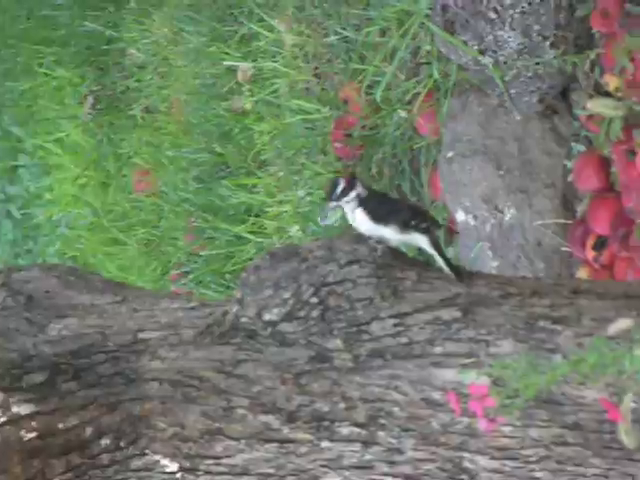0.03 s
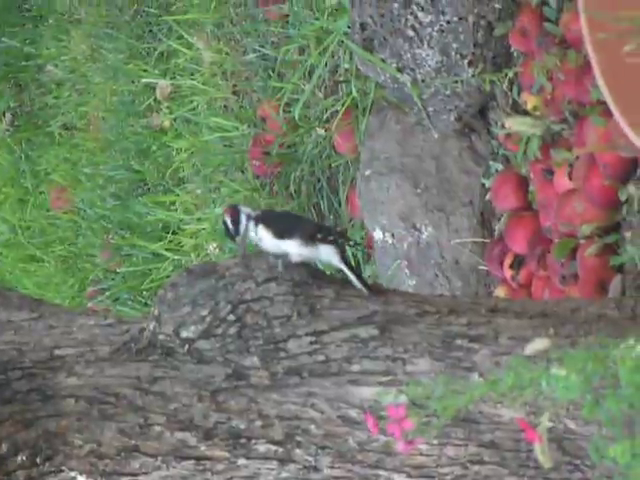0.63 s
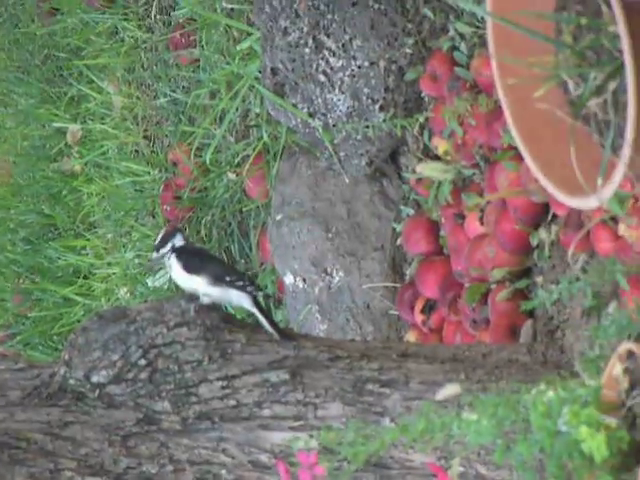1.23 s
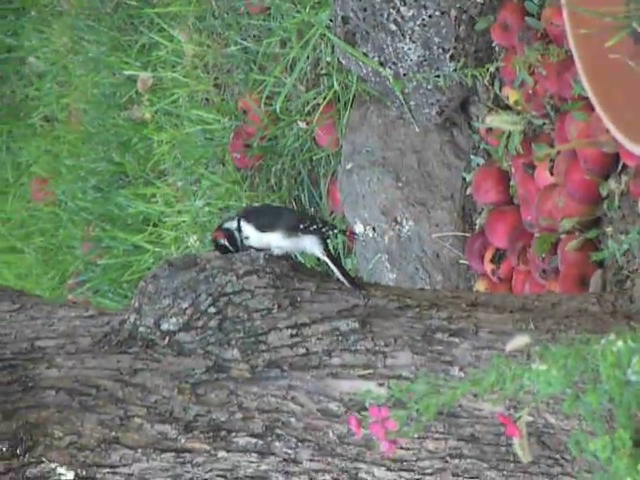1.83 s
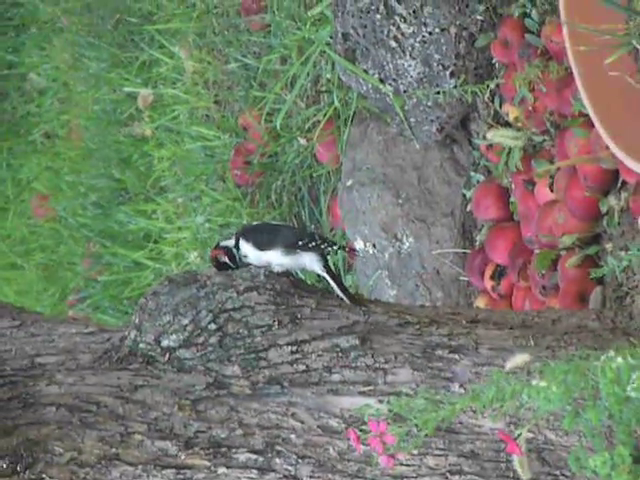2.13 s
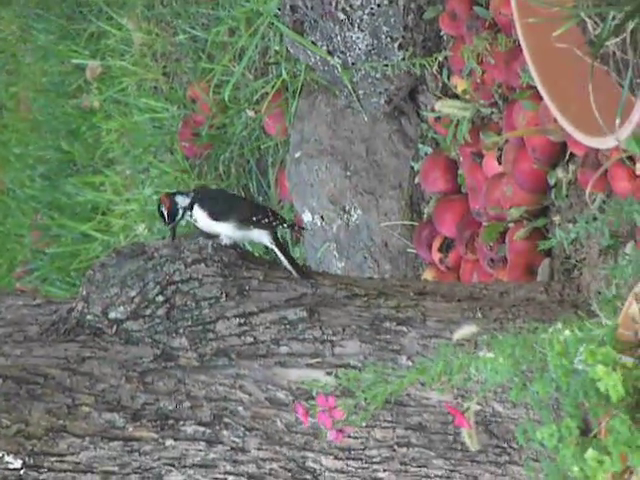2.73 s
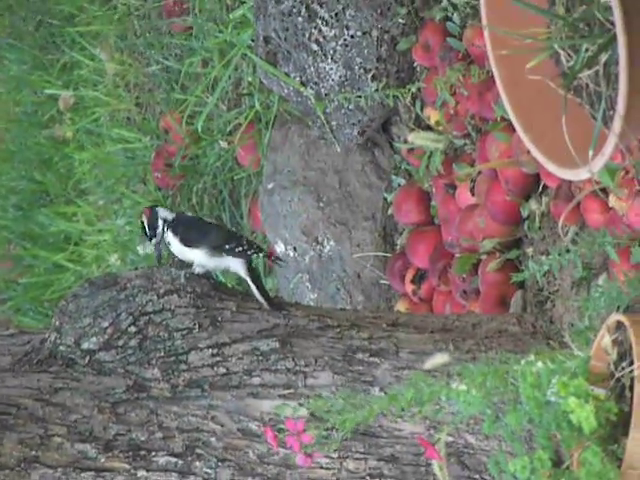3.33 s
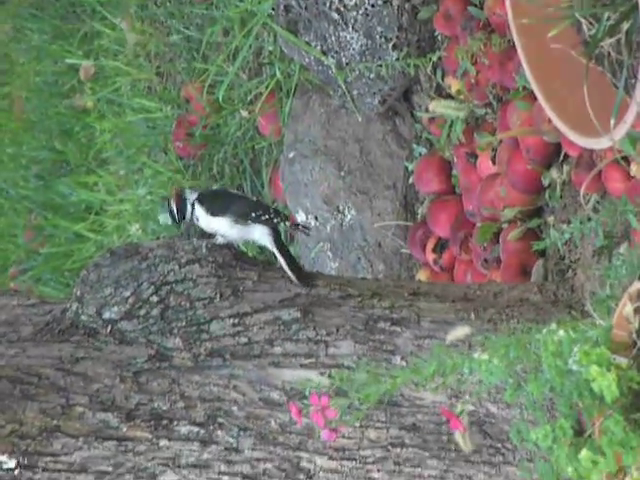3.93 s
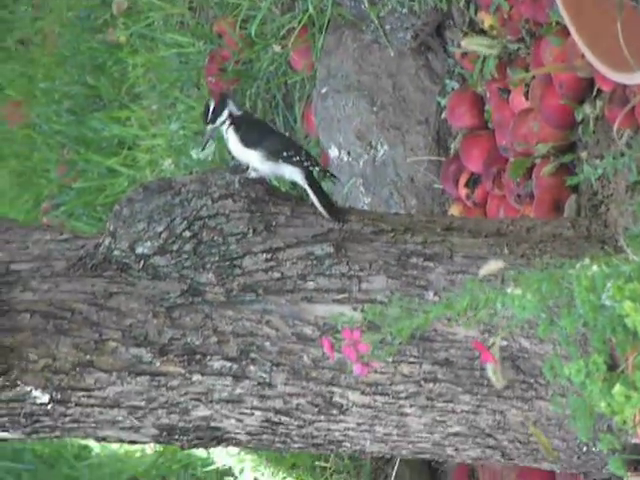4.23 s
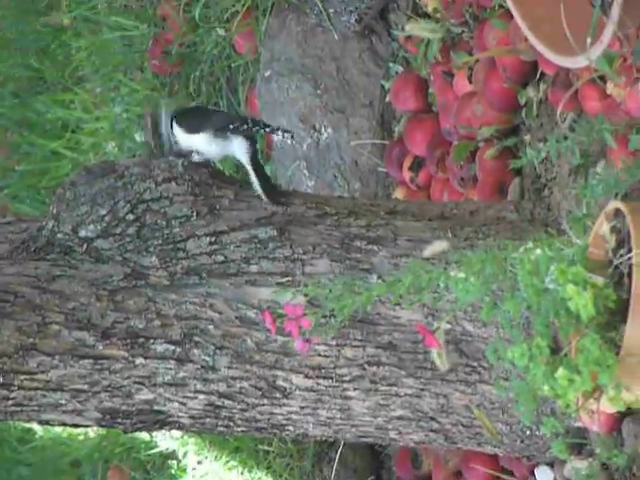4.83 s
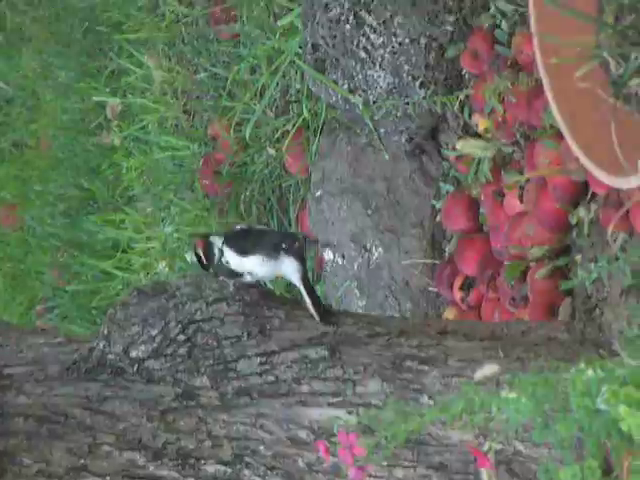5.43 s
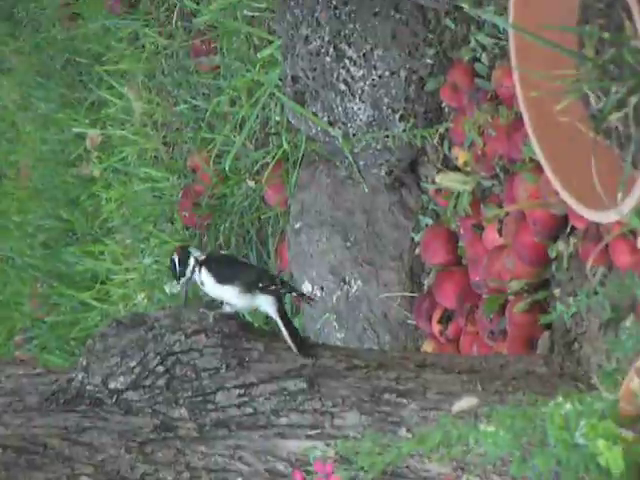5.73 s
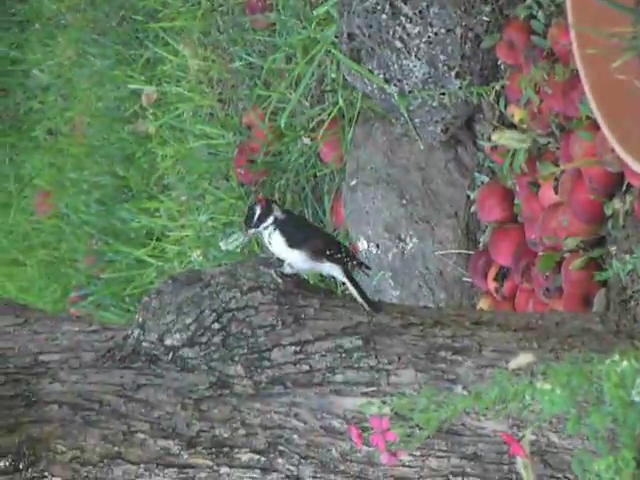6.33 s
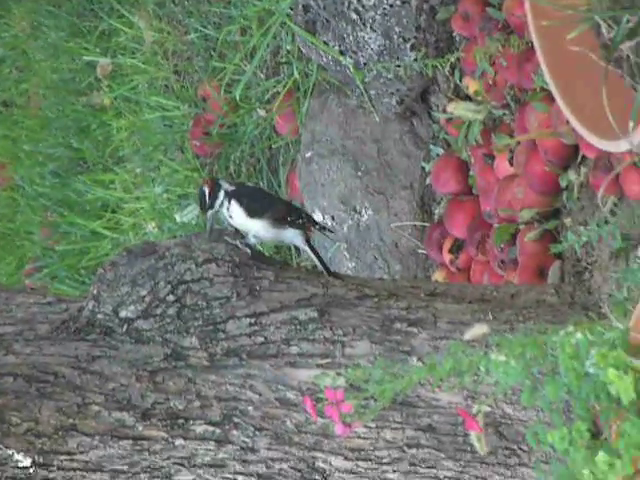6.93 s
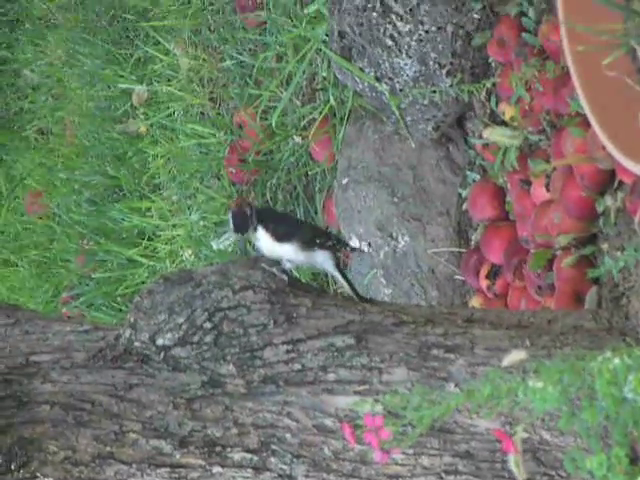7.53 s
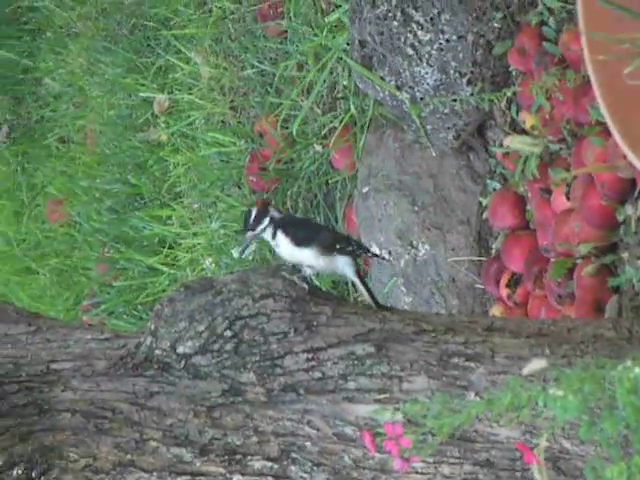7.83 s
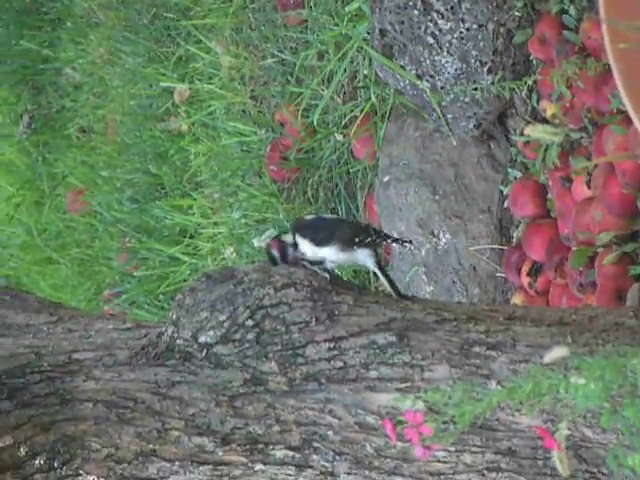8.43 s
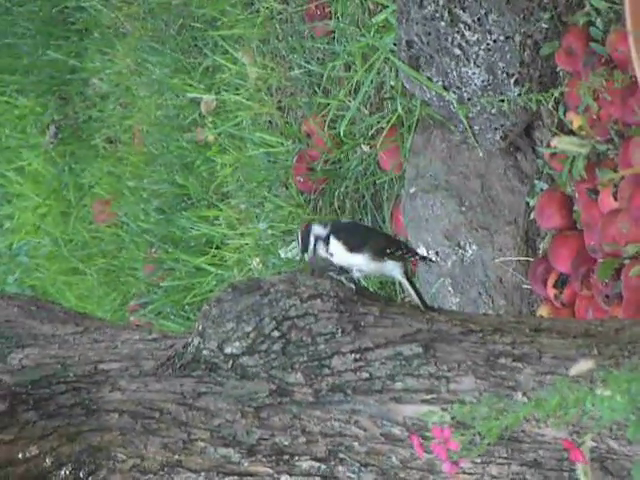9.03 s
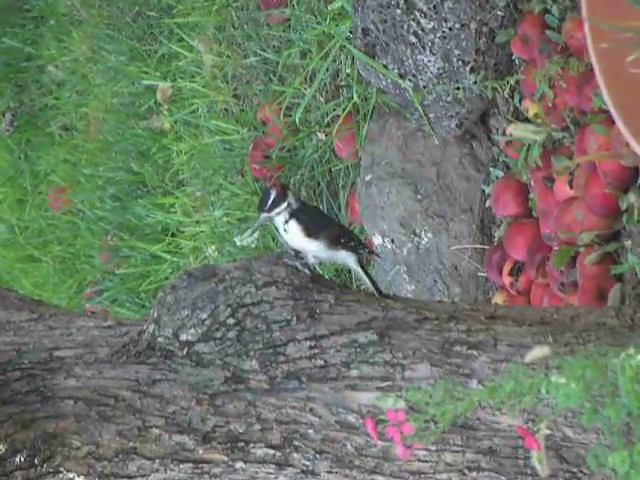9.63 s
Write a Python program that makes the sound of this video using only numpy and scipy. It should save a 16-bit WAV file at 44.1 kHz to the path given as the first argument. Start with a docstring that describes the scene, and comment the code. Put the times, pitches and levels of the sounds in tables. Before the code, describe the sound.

A woodpecker taps sharply on a tree trunk in three irregular bouts, over soft outdoor air and a low motor hum.

```python
"""From the start, quiet garden air and an electric motor's hum are heard; a far insect chirps at times.
At 0.6 s a small woodpecker begins on a knot in a thick trunk. Each peck crushes bark, cracks on the hard
layer below and excites damped modes of bark plate and trunk. Late in the pause after this first bout,
flakes of bark tick; two more irregular bouts follow at 4.8 s and 6.8 s, and the last of a few beak
scrapes at 8.6 s. Everything passes through a narrow, dull microphone channel."""
import sys
import numpy as np
from scipy.fft import rfft, irfft, next_fast_len
from scipy.io import wavfile
from scipy.ndimage import map_coordinates

SR = 44100
rng = np.random.default_rng(int(sys.argv[2]) if len(sys.argv) > 2 else 0)


def transcribe(u):
    """Save the signal u as a 16-bit wav file named by the first command-line argument.

    u: samples, shape (n,) or (channels, n), limited to [-1, 1]; the rate is SR.
    q: integer samples, one column per channel.
    """
    v = np.clip(np.atleast_2d(u).T, -1, 1)
    q = np.round(v * 32767).astype(np.int16)
    wavfile.write(sys.argv[1], SR, q)


N = 426447
EVENT_T = np.arange(int(.06 * SR)) / SR  # time axis of one short sound, t/s

# spectrum of the air and hiss: f/Hz, relative density/dB
AIR_SPECTRUM = [(30, -16), (100, -12.5), (160, -3.5), (315, -5), (370, 2), (430, -2), (480, -.3),
                (560, -1.5), (665, 1), (715, -2.5), (800, -4.5), (900, -1.7), (1120, -3.9), (1400, -9.6),
                (1600, -6.5), (1820, -11.7), (4500, -16.9), (6000, -61)]
# harmonics of the motor's shaft: multiple of the rotation rate, rms level/dB
SHAFT_HARMONICS = [(1, -66), (3, -67), (4, -54.2), (6, -57), (7, -66), (8, -64), (9, -64), (18, -66)]
# magnetic hum: multiple of the mains frequency, rms level/dB, sideband spacing/Hz
MAGNETIC_HARMONICS = [(2, -56.8, 6.35), (6, -49, 19.1), (8, -65, 19.1), (10, -53.5, 19.1), (12, -66, 19.1),
                      (14, -65, 19.1)]
# insect chirps, on a nearly even pulse with gaps: t/s, level/dB
CHIRPS = [(.42, -55), (3.42, -57), (3.72, -55), (4.38, -56), (5.04, -56), (5.35, -56.5), (5.99, -52),
          (6.3, -54.5), (7.24, -55.5), (7.55, -54.5), (7.86, -53.5), (8.17, -56.5), (8.48, -55.5),
          (8.79, -51.5), (9.09, -54), (9.4, -55.5)]
# bark flakes snapping under beak and claws: t/s, level/dB
FLAKE_SNAPS = [(4.259, -40), (4.634, -38), (4.839, -34)]
# modes of a loose flake: f/Hz, relative level/dB, rise time/s
FLAKE_MODES = [(1245, 0, .0052), (2750, -10, .003)]
# strokes of the beak over the bark: t/s, level/dB, rise time/s, pitch/Hz
SCRAPES = [(1.341, -54, 0.0037, 2450), (3.036, -47, .004, 2450), (4.652, -41.5, 0.0097, 1850),
           (4.859, -40.5, .01, 2400), (5.081, -52, .005, 2150), (8.245, -49.5, .007, 2250),
           (8.635, -44.5, .003, 2460)]
# spectrum of scraped bark: multiple of the stroke's pitch, relative density/dB
SCRAPE_SPECTRUM = [(.45, -20.5), (.8, -3.5), (1, 1), (1.25, -7), (1.8, -15)]
# spectrum of crumbling bark: f/Hz, relative density/dB
CRUMB_SPECTRUM = [(300, -35), (900, -6), (1300, -1.5), (1700, -2), (2500, 2), (3300, -4), (4300, -19)]
# modes of the bark as the beak bites deeper: f/Hz, relative level/dB, rise time/s
BITE_MODES = [(1121, 0, .0016), (1878, -.4, .0017), (2368, -1.2, .002), (2988, -2.4, .0017)]
# low modes of the trunk: multiple of the thud pitch, relative level/dB, rise time/s
TRUNK_MODES = [(.99, 0, .0054), (1.84, -16, .0041)]
# modes of the knot's bark plate: multiple of the knock pitch, relative level/dB, rise time/s
PLATE_MODES = [(.98, 0, .00265), (1.01, -13.9, .0083), (1.42, -11, .0042), (.81, -15.5, .0022)]
# modes of the beak on hard bark: f/Hz, relative level/dB, rise time/s
CRACK_MODES = [(2500, 0, .00055), (3145, .3, .00056), (3650, -1, .00046), (1287, -11.3, .0009)]
# pecks: t/s, crush level/dB, crack level/dB, crack tilt/(dB per octave), bite level/dB, knock level/dB,
# thud level/dB, lag of the wood after the crack/s, knock pitch/Hz, thud pitch/Hz
PECKS = [(0.6416, -42.0, -33.5, -5.5, -31.5, -26.5, -28.0, -0.0004, 957.0, 334.0),
         (0.8059, -50.0, -22.5, 0.5, -37.0, -28.5, -27.0, 0.0019, 871.0, 340.0),
         (1.0065, -53.0, -33.0, -1.0, -35.5, -27.0, -29.5, 0.0006, 924.0, 328.0),
         (1.2166, -50.0, -33.5, 0.5, -32.5, -27.0, -30.0, 0.0016, 963.0, 325.0),
         (1.7742, -56.0, -19.5, 4.0, -36.0, -31.5, -29.5, 0.0023, 878.0, 336.0),
         (1.8827, -46.0, -35.5, -4.0, -34.0, -31.0, -30.0, -0.0002, 875.0, 328.0),
         (2.1399, -46.0, -22.0, 2.0, -35.5, -31.0, -31.5, 0.0023, 976.0, 321.0),
         (2.305, -47.0, -22.0, 0.5, -37.0, -32.5, -34.5, 0.0023, 874.0, 316.0),
         (2.5109, -42.0, -33.0, -5.5, -36.0, -31.0, -28.0, -0.0005, 962.0, 335.0),
         (2.7173, -52.0, -34.5, 0.0, -37.0, -31.0, -29.0, -0.0001, 943.0, 344.0),
         (2.8405, -46.0, -37.5, 1.0, -39.0, -35.0, -26.0, 0.0006, 856.0, 333.0),
         (4.7745, -47.0, -33.5, -4.5, -33.5, -27.0, -25.0, -0.0005, 954.0, 337.0),
         (4.8808, -43.0, -21.5, 0.0, -35.5, -30.0, -25.5, 0.0019, 861.0, 337.0),
         (5.1423, -42.0, -34.5, -0.5, -42.5, -32.5, -31.5, 0.0006, 891.0, 334.0),
         (5.3106, -46.0, -38.0, -6.0, -39.0, -30.0, -29.0, -0.0003, 959.0, 333.0),
         (5.5076, -52.0, -32.5, -3.0, -40.0, -34.5, -32.5, -0.0002, 888.0, 315.0),
         (5.717, -47.0, -34.0, -7.0, -36.0, -32.0, -30.0, -0.0002, 916.0, 332.0),
         (5.8399, -48.0, -33.0, -5.0, -37.5, -33.5, -27.0, 0.0012, 854.0, 335.0),
         (6.7773, -46.0, -39.0, -6.0, -35.5, -29.0, -30.5, -0.0003, 950.0, 330.0),
         (6.8788, -56.0, -16.5, 4.0, -30.5, -29.0, -28.5, 0.0019, 892.0, 338.0),
         (7.1412, -43.0, -39.0, -1.5, -35.5, -28.0, -31.5, 0.0006, 963.0, 318.0),
         (7.3074, -55.0, -16.5, 1.5, -32.0, -29.5, -28.0, 0.0019, 1000.0, 341.0),
         (7.5081, -41.0, -37.5, -4.5, -34.5, -28.0, -28.5, 0.0011, 967.0, 340.0),
         (7.7156, -51.0, -32.0, 2.5, -33.0, -31.5, -32.5, -0.0006, 868.0, 321.0),
         (7.8408, -47.0, -26.5, -2.5, -37.5, -29.5, -33.0, 0.0023, 867.0, 319.0),
         (8.0498, -54.0, -39.0, -2.0, -35.0, -31.0, -27.5, 0.0, 864.0, 349.0),
         (8.274, -46.0, -23.0, 4.5, -36.0, -29.5, -31.5, 0.0023, 856.0, 328.0),
         (8.3834, -51.0, -38.0, -6.0, -35.5, -28.5, -26.5, -0.0004, 926.0, 337.0)]
# treble response of the channel: f/Hz, gain/dB
CHANNEL_RESPONSE = [(3500, 0.5), (3900, -5.5), (4150, -13), (4400, -31), (4800, -52)]


def amp(db):
    """Amplitude ratio of a level in decibels."""
    return 10 ** (np.asarray(db) / 20)


def along(points, hz):
    """Interpolation of (f/Hz, value) points on a logarithmic frequency axis."""
    f, v = np.transpose(points)
    return np.interp(np.log(hz + 1), np.log(f + 1), v)


def wobble(rate):
    """Slow random modulation: a spline through `rate` Gaussian values a second."""
    knots = rng.standard_normal(int(N * rate / SR) + 4)
    coarse = np.linspace(0, N, num=2000)
    return np.interp(np.arange(N), coarse, map_coordinates(knots, [coarse * rate / SR]))


def filtered(x, response):
    """Linear filtering: the spectrum of x is multiplied by a frequency response."""
    size = next_fast_len(len(x) + 8192)
    return irfft(rfft(x, size) * response(np.fft.rfftfreq(size, 1 / SR)), size)[:len(x)]


def noise(spectrum, size):
    """Spectral shaping of white noise, normalised to rms 1."""
    coloured = filtered(rng.standard_normal(size), lambda hz: amp(along(spectrum, hz)))
    return coloured / np.sqrt(np.mean(coloured ** 2) + 1e-20)


def swell(rise_s):
    """A transient envelope: smooth growth to 1 at rise_s, then nearly exponential decay."""
    u = EVENT_T / rise_s
    return (u * np.exp(1 - u)) ** 2


def ring(modes, scatter_db, detune=.012, tilt_db=0):
    """Superposition of heavily damped modes, tilted per octave; level and pitch vary from spot to spot."""
    hz, db, rise_s = np.transpose(modes)[:, :, None]
    level_draw, pitch_draw = rng.standard_normal((2, len(modes), 1))
    gain = amp(db + scatter_db * level_draw + tilt_db * np.log2(hz / hz[0]))
    waves = np.sin(2 * np.pi * hz * (1 + detune * pitch_draw) * EVENT_T)
    return np.sum(gain * swell(rise_s) * waves, axis=0) / np.linalg.norm(gain)


def add(track, s, sound):
    """Superposition of a sound on the track from time s."""
    start = round(s * SR)
    track[start:start + len(sound)] += sound[:N - start]


def air(level_db=-43.05, drift_db=.51):
    """Outdoor air and hiss are nearly stationary broadband noise whose level drifts slightly."""
    return amp(level_db + drift_db * wobble(1.8)) * noise(AIR_SPECTRUM, N)


def motor(mains_hz=60.08, shaft_hz=59.05, flutter=.00079, waver_db=.7, sideband_step_db=-4):
    """Beating: the shaft runs just below mains frequency, so their harmonics beat; sidebands add throb."""
    clock = np.cumsum(1 + flutter * wobble(4)) / SR  # all tones waver in pitch together
    partials = [(k * shaft_hz, db) for k, db in SHAFT_HARMONICS]
    partials.append((198.7, -61.5))  # a lone tone outside both series: f/Hz, rms level/dB
    tones = [(db, np.exp(2j * np.pi * hz * clock)) for hz, db in partials]
    for k, db, spacing_hz in MAGNETIC_HARMONICS:
        carrier = np.exp(2j * np.pi * k * mains_hz * clock)
        throb = amp(sideband_step_db) * np.exp(2j * np.pi * (spacing_hz * clock + rng.random()))
        tones.append((db, carrier * (1 + throb + throb ** 2)))  # two upper sidebands
    out = np.zeros(N)
    for db, tone in tones:
        peak = np.sqrt(2) * amp(db + waver_db * wobble(7))
        out += peak * np.real(tone * np.exp(2j * np.pi * rng.random()))
    return out


def insect(pitch_hz=3410, rise_s=.011, detune=.011):
    """Each far chirp is a tone burst: a sinusoid under a short envelope."""
    out = np.zeros(N)
    for s, db in CHIRPS:
        tone = np.sin(2 * np.pi * pitch_hz * (1 + detune * rng.standard_normal()) * EVENT_T)
        add(out, s - rise_s, amp(db) * swell(rise_s) * tone)
    return out


def flakes():
    """Free vibration: a loose flake of bark snaps and rings briefly."""
    out = np.zeros(N)
    for s, db in FLAKE_SNAPS:
        add(out, s, amp(db) * ring(FLAKE_MODES, scatter_db=1.5))
    return out


def scrapes():
    """Friction of beak on bark gives short bursts of noise with a broad spectral peak."""
    out = np.zeros(N)
    for s, db, rise_s, hz in SCRAPES:
        spectrum = np.array(SCRAPE_SPECTRUM) * [hz, 1]
        add(out, s, amp(db) * swell(rise_s) * noise(spectrum, len(EVENT_T)))
    return out


def crumbs(crush_trim_db=-.5, crush_lead_s=.0105, crush_rise_s=.0062, debris_db=-7.5, debris_rise_s=.0033):
    """Fracture noise: loose bark is crushed just before each crack and crumbles again under the bite."""
    out = np.zeros(N)
    for s, crush_db, _, _, bite_db, _, _, lag_s, *_ in PECKS:
        crush = swell(crush_rise_s) * noise(CRUMB_SPECTRUM, len(EVENT_T))
        debris = swell(debris_rise_s) * noise(CRUMB_SPECTRUM, len(EVENT_T))
        add(out, s - crush_lead_s, amp(crush_db + crush_trim_db) * crush)
        add(out, s + lag_s, amp(bite_db + debris_db) * debris)
    return out


def wood(thud_lead_s=.00028):
    """Resonance: the beak bites in; trunk and bark plate answer more slowly, at pitches set by the spot."""
    out = np.zeros(N)
    for s, _, _, _, bite_db, knock_db, thud_db, lag_s, knock_hz, thud_hz in PECKS:
        add(out, s + lag_s, amp(bite_db) * ring(BITE_MODES, scatter_db=1.5, detune=.025))
        trunk = (TRUNK_MODES, thud_db, thud_hz, thud_lead_s)
        plate = (PLATE_MODES, knock_db, knock_hz, 0)
        for modes, level_db, pitch_hz, lead_s in trunk, plate:
            tuned = [(multiple * pitch_hz, db, rise_s) for multiple, db, rise_s in modes]
            add(out, s + lag_s - lead_s, amp(level_db) * ring(tuned, scatter_db=2, detune=.004))
    return out


def beak(rebound_s=.0034, rebound_db=-11, rebound_tilt_db=-10):
    """Impact: the harder the spot, the brighter the crack; the beak rebounds with a duller click."""
    out = np.zeros(N)
    for s, _, crack_db, tilt_db, *_ in PECKS:
        crack = ring(CRACK_MODES, scatter_db=.5, tilt_db=tilt_db)
        rebound = ring(CRACK_MODES, scatter_db=.5, tilt_db=tilt_db + rebound_tilt_db)
        add(out, s, amp(crack_db) * crack)
        add(out, s + rebound_s, amp(crack_db + rebound_db) * rebound)
    return out


def near_echo(x, delay_s=.000894, echo_db=-3):
    """Comb filtering: the reflection from a nearby surface interferes with the direct sound."""
    return filtered(x, lambda hz: 1 + amp(echo_db) * np.exp(-2j * np.pi * hz * delay_s))


def scene():
    """Sound pressures add: the bird over its background, in mono."""
    bird = near_echo(beak()) + wood() + crumbs() + flakes() + scrapes()
    return (bird + insect() + motor() + air())[None]


def record(dry):
    """Band limiting: the channel rolls off the treble and passes nothing above its cutoff."""
    cutoff_hz = 4900
    return filtered(dry[0], lambda hz: amp(along(CHANNEL_RESPONSE, hz)) * (hz < cutoff_hz))[None]


dry = scene()
out = record(dry)
transcribe(out)
```